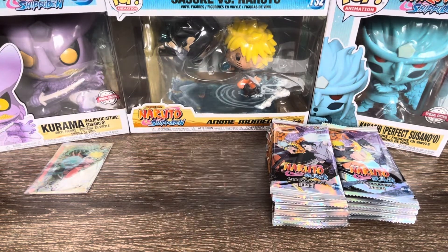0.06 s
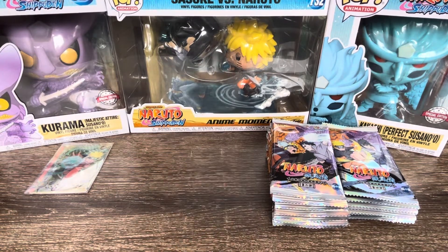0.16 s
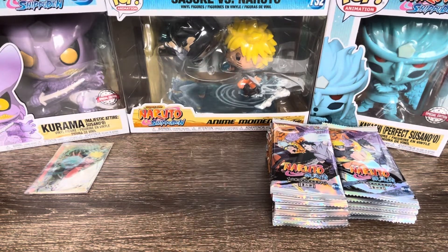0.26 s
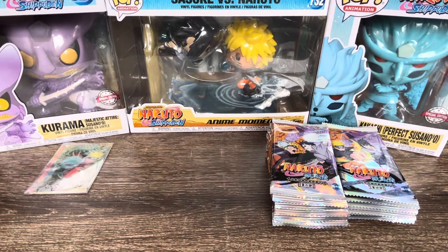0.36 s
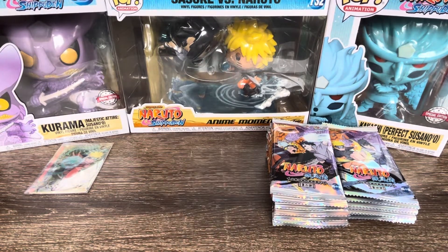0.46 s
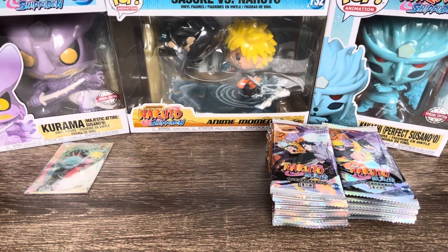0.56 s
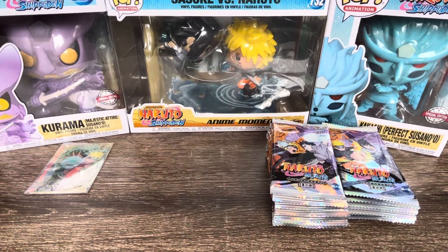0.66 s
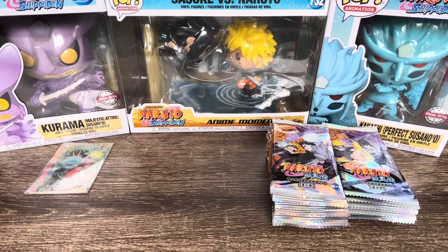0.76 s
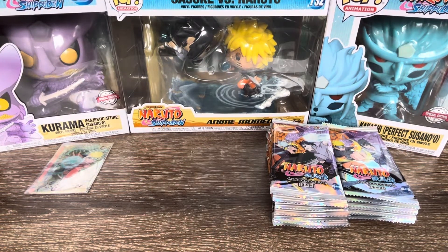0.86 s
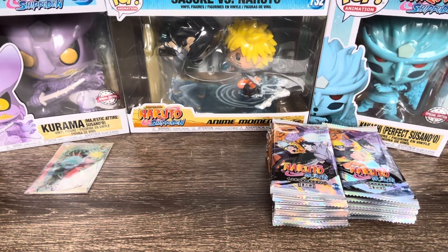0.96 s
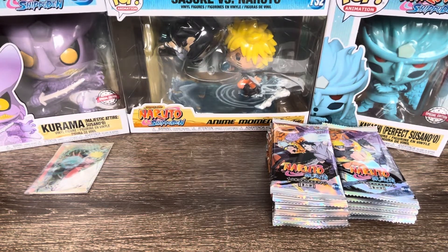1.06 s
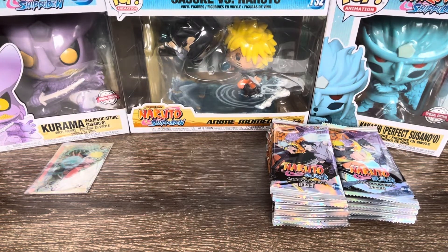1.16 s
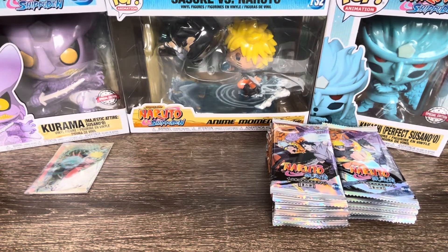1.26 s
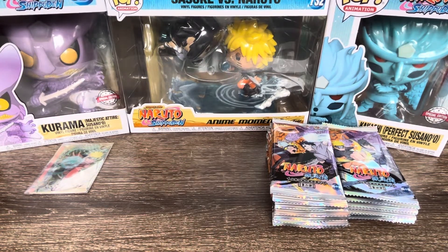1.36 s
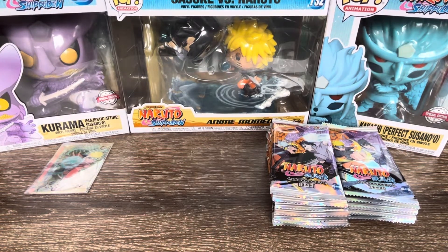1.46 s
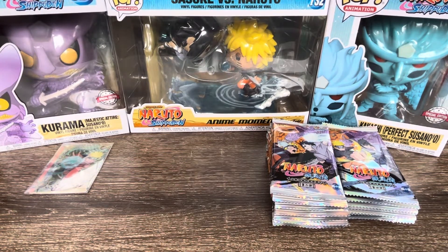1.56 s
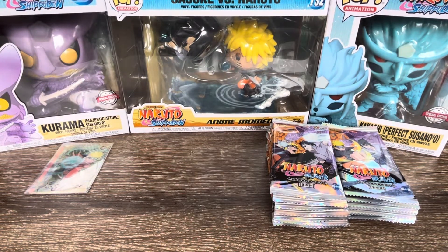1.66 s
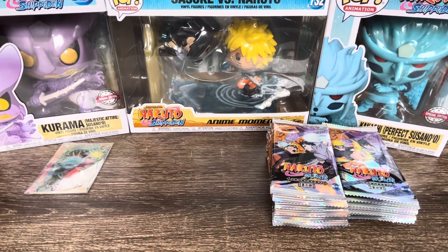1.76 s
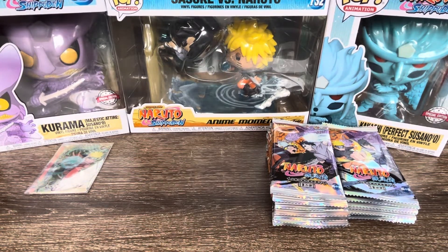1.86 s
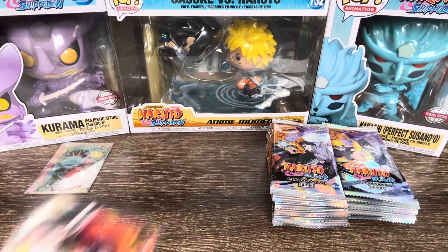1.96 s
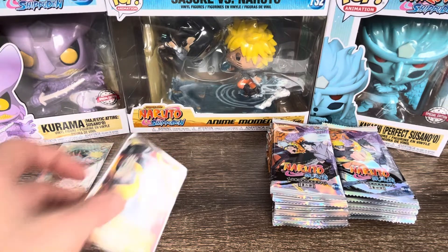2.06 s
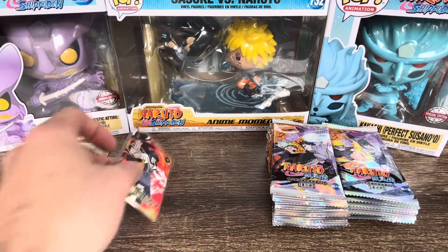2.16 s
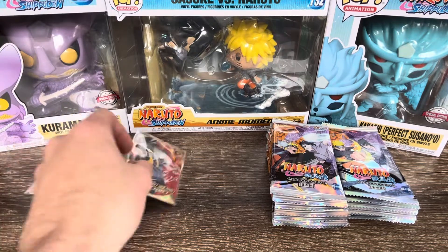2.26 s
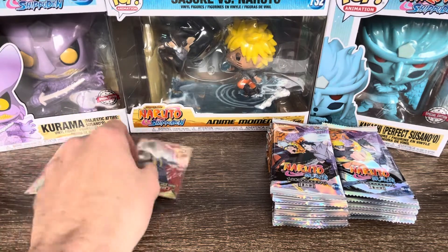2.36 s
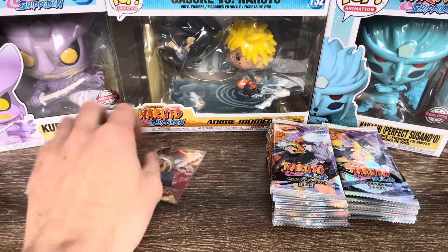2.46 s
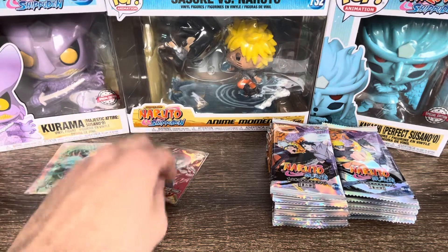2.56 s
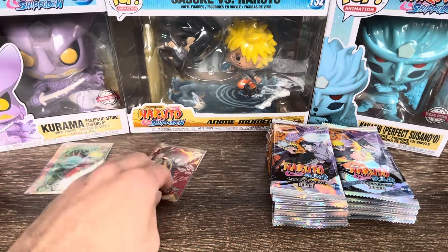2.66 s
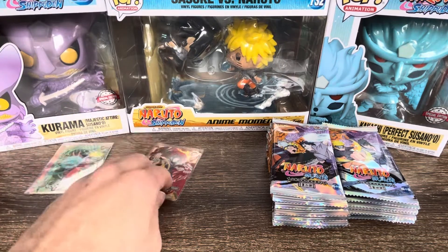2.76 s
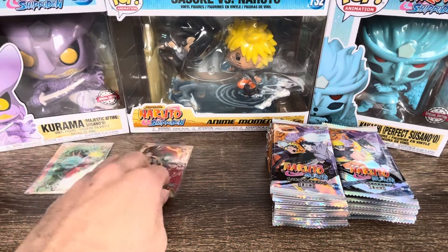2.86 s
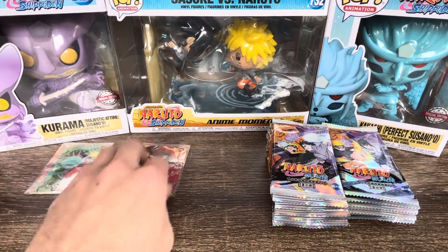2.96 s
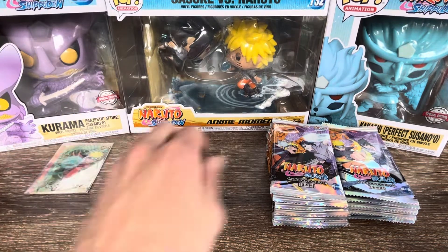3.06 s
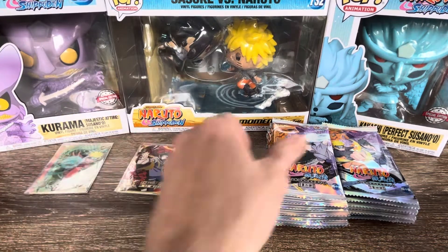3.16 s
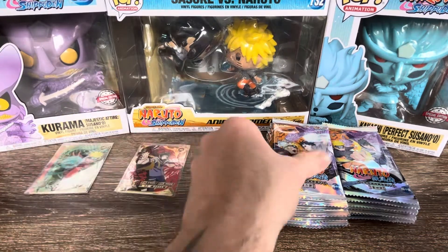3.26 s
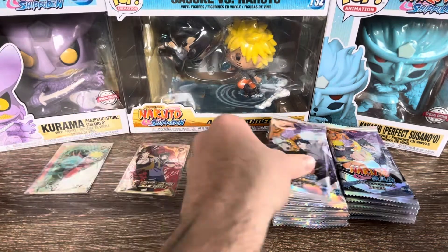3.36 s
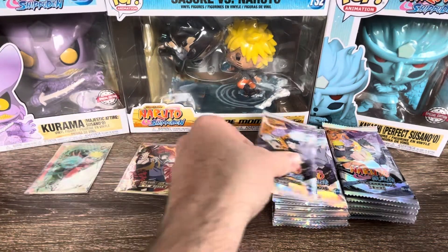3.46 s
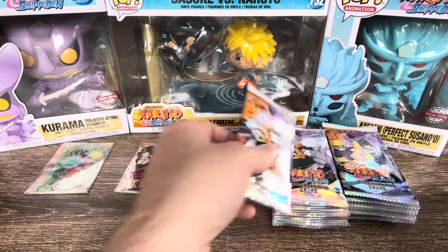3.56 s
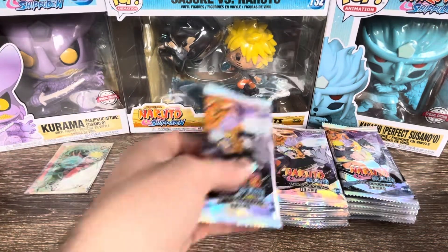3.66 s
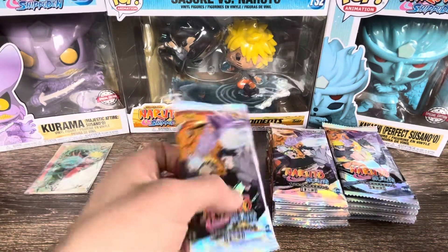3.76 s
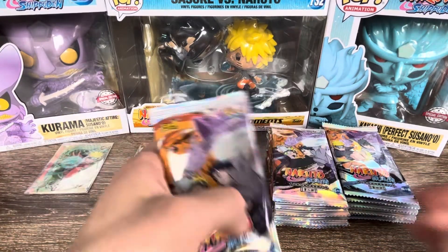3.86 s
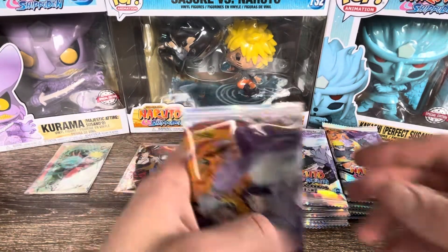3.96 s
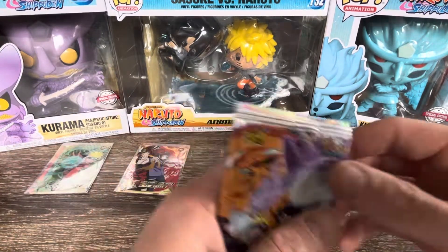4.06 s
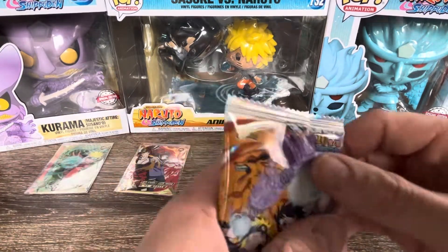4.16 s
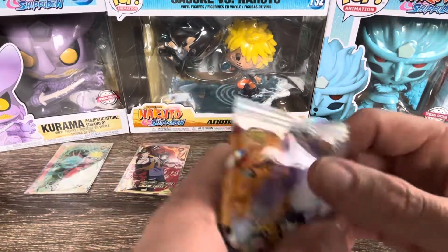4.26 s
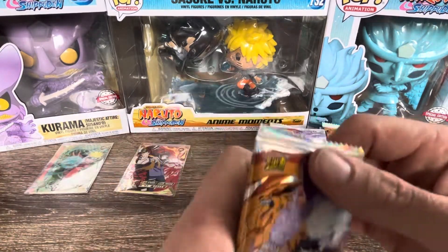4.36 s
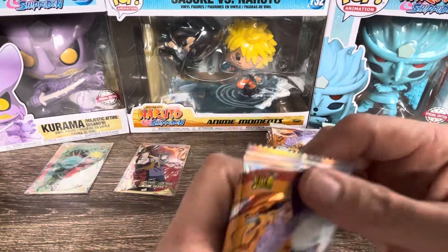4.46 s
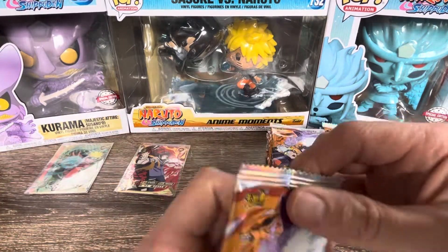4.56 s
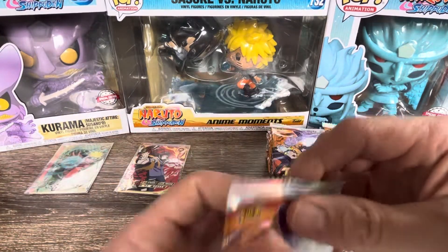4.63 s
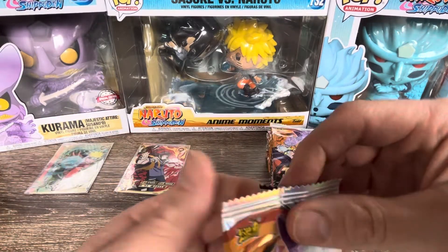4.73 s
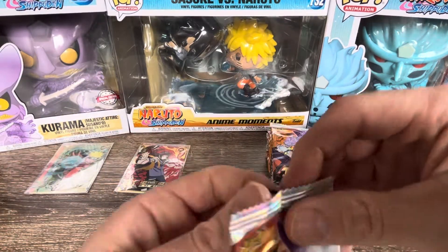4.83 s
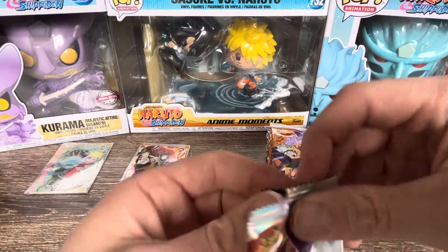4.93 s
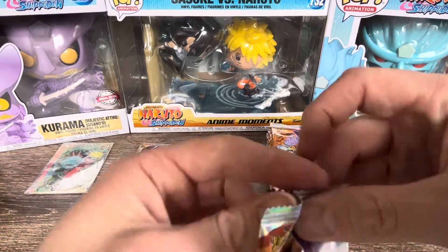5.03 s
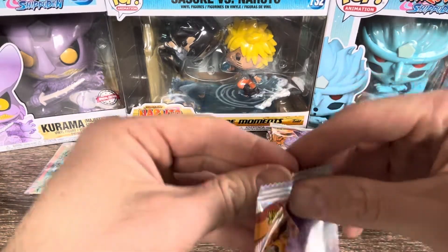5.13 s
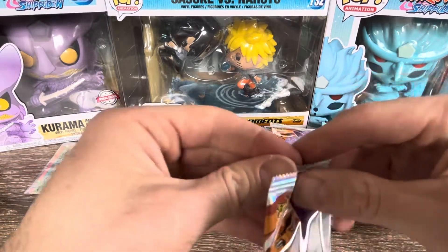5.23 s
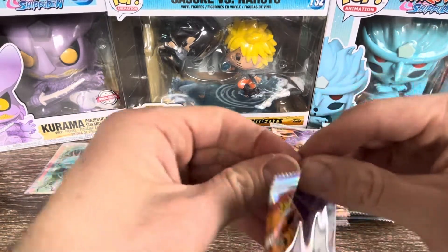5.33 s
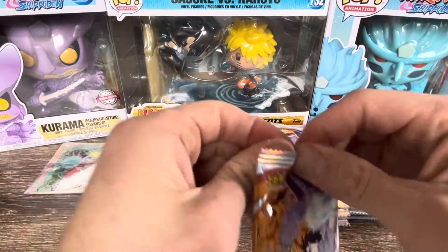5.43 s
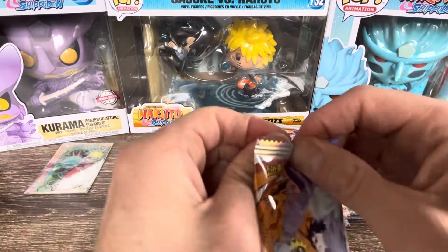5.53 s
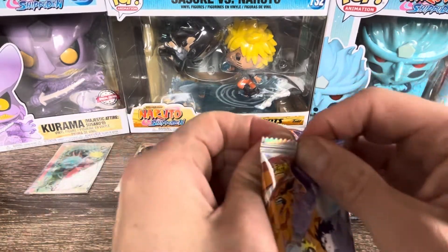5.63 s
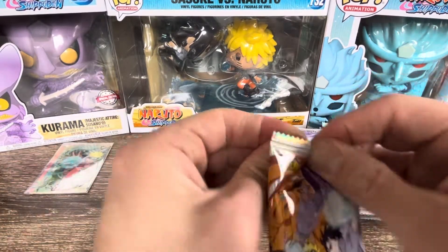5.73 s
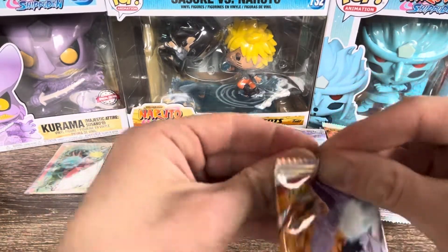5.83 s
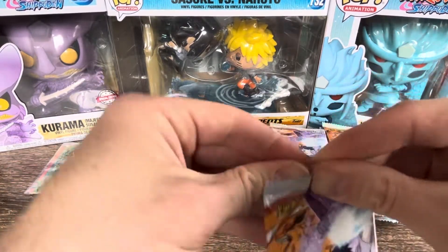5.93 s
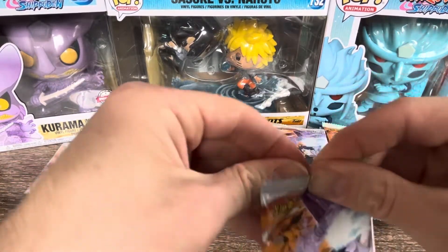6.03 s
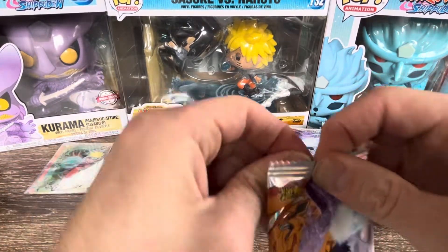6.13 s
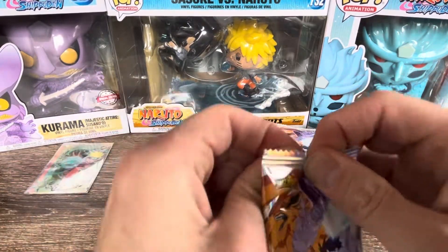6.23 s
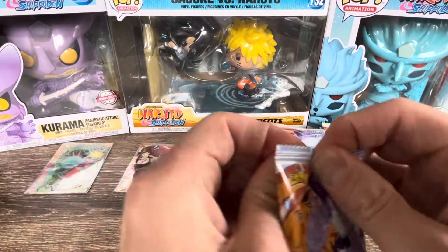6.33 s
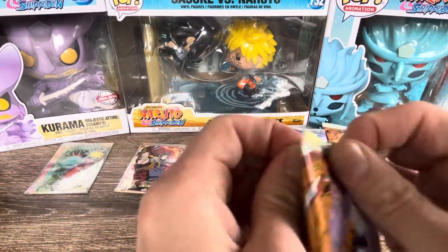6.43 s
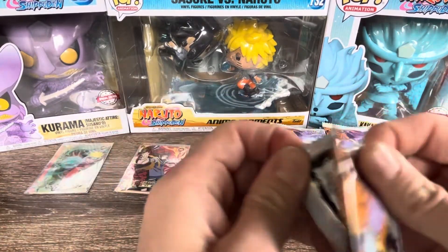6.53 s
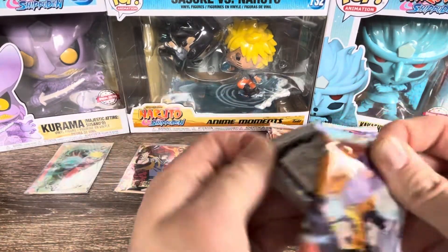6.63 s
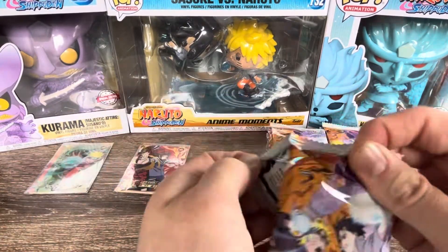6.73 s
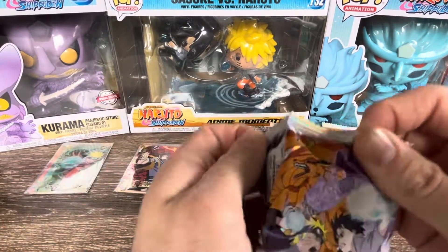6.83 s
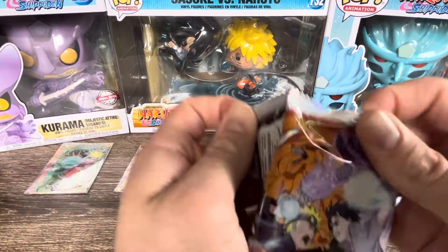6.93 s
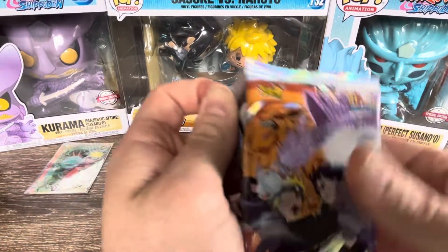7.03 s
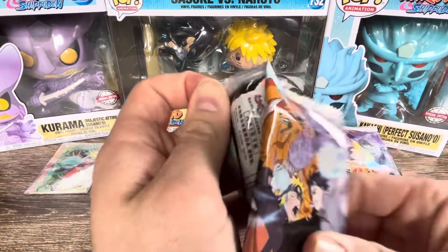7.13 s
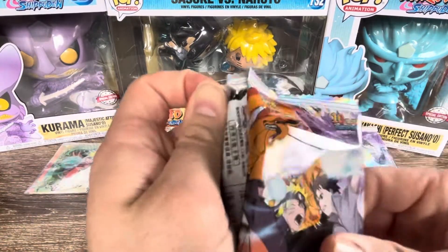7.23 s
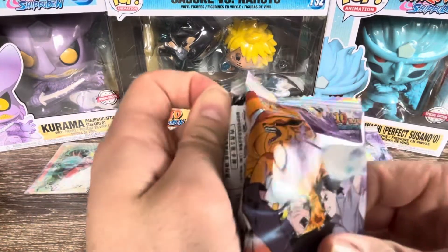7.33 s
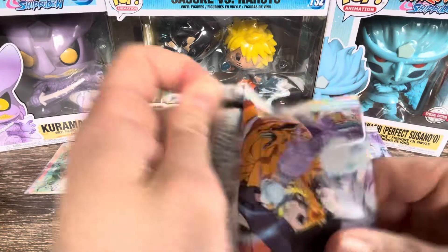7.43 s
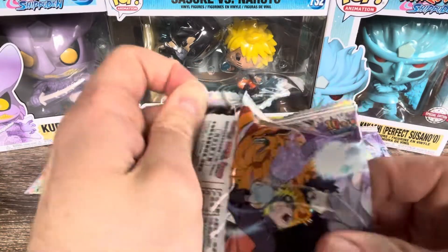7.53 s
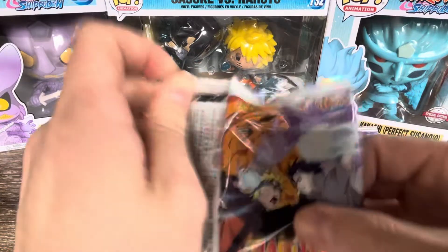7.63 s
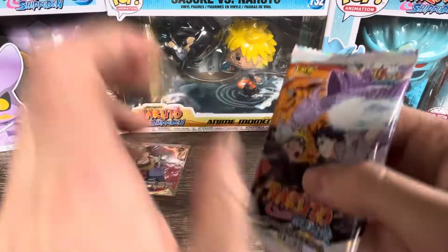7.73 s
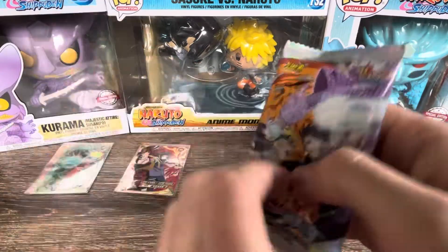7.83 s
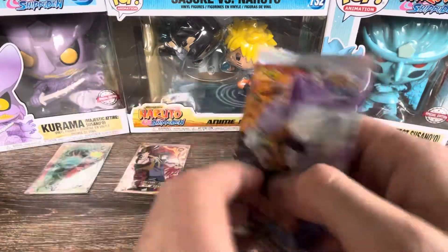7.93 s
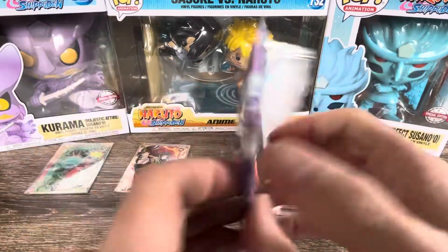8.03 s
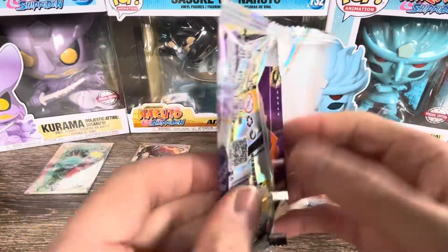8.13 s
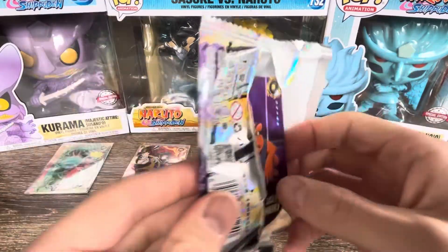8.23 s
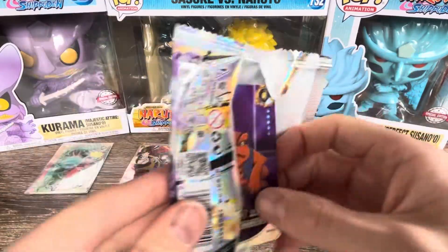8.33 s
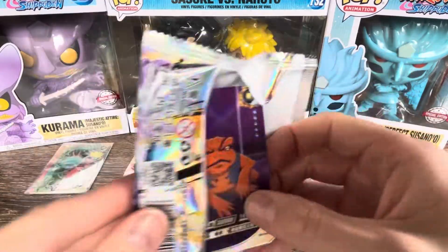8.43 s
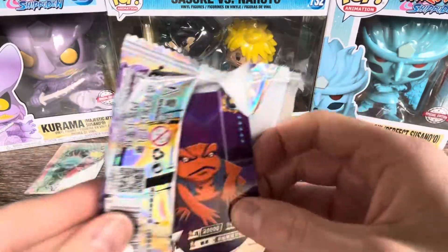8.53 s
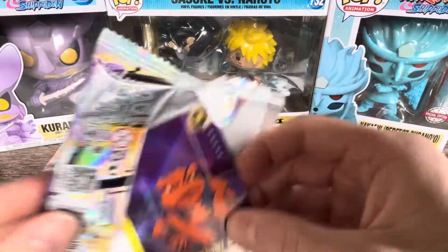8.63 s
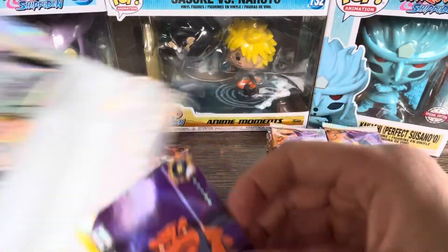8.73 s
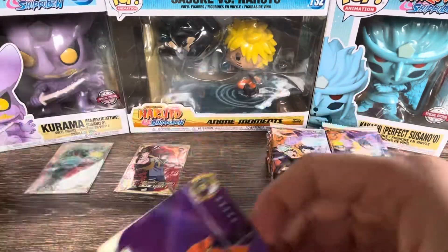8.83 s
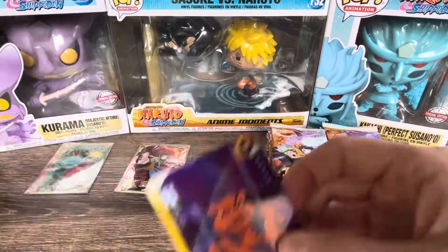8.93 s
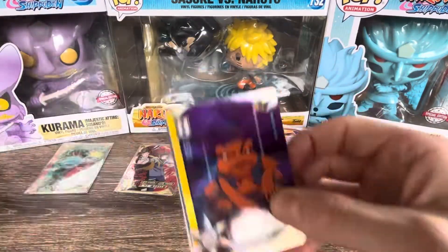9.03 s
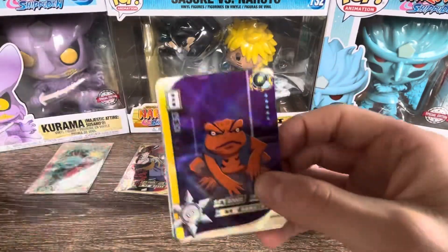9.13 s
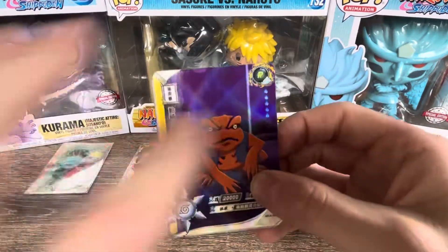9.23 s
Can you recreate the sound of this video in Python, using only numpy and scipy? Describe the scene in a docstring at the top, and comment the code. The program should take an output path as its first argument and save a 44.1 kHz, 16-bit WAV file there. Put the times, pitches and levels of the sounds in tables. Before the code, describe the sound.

A close, dry stereo take at a wooden table in a small furnished room, with very faint hiss. At 0 s cards brush softly, with a sharp snap at 0.1 s. Light clicks follow around 0.8 and 1.5 s, the latter clearer, then near quiet with faint rubs and tiny ticks until 3.4 s. Foil slides at 3.6 s, and from 4.05 to 4.5 s it crackles brightly and loudly. From 4.6 to 6.3 s come sparser crinkles and isolated pops, with a tiny high squeak at 4.6. From 6.4 s the crackling thickens; tearing peaks between 6.7 and 7.7 s, with short rough skin squeaks and dull low thumps, the strongest near 7.4. Looser, papery rustling and snaps run from 7.9 to 8.8 s as cards slip out, with soft air movement and a small rising squeak at 8.7. After that only a faint card touch at 9.24 s.

```python
"""First comes a soft brush of cards and a sharp snap: cards are shuffled and laid on a wooden table.
Then two hands pick up a foil pack, tear it and slip the cards out. Ringing noise bursts make the snaps,
roughened noise the rustle, gliding tones the squeaks, and sinking low tones the thumps. Low noise is air
moved by hands at a close pair of microphone ports; scattered echoes make a small furnished room, over hiss."""
import sys
import numpy as np
from scipy import signal
from scipy.fft import rfft, irfft
from scipy.io import wavfile
from scipy.ndimage import uniform_filter1d

SR = 44100
rng = np.random.default_rng(int(sys.argv[2]) if len(sys.argv) > 2 else 0)


def master_out(mix):
    """Clip the mix to full scale and print it as 16-bit PCM to the path in sys.argv[1]."""
    frames = np.transpose(np.atleast_2d(mix))
    ceiling = np.clip(frames, -1, 1)
    pcm = np.round(ceiling * 32767).astype(np.int16)
    wavfile.write(sys.argv[1], SR, pcm)


N = 409688

BASS_LEFT_DB = 2.5  # the left port takes more of the low sound
LEADS = 7, 8, 4  # samples by which the left port hears low, middle and high sound earlier
STIR_LEAD = 45  # samples by which low pushes and moving air reach the left port first
EDGE_HZ = 16700  # upper limit of the sound

# creases that buckle: t/s, level/dB of the crease, crease f/Hz, panel level/dB relative to the crease,
# panel f/Hz, finest-crease level/dB relative to the crease
BUCKLES = [(0.1211,-6.5,3020,-4.5,1805,-7.5),(0.808,-30,5830,-1.5,1344,-7.5),(1.049,-36.5,6320,-0.5,1510,-2),(1.4672,-27.5,5900,-8,2080,0.5),
           (1.508,-25.5,2990,-8,2520,-31),(1.532,-14.5,6070,-13.5,1524,-10.5),(1.5914,-30,7100,-0.5,1190,-4),
           (1.724,-34,5430,-14,900,-6),(2.1627,-40,6400,-12,820,2),(2.355,-33,4040,-17,2580,-7.5),(3.4515,-52,6200,14.5,800,-10),
           (3.873,-41.5,4300,4,875,-16),(3.9368,-29,4910,0,2160,-30),(4.0586,-21,5770,-6,1000,-26),(4.082,-11.5,4790,-6,2290,-24.5),
           (4.1444,-2.5,4850,-14.5,2510,-4.5),(4.167,-7,5750,-12.5,1850,-15.5),(4.179,-16,5050,-9,1710,4.5),(4.2078,-4,5930,-1.5,2534,-5.5),
           (4.2384,-8,5660,-6.5,2490,-9),(4.259,-21,3980,-4.5,810,-15),(4.3,-13.5,2950,-9.5,422,-27),(4.352,-6.5,7000,-12,625,-7),(4.384,-25,4530,-3,1020,-11),(4.483,-17,4760,-25,2190,-5),
           (4.5161,-17,3050,2.5,980,-2.5),(4.536,-10,5950,-9,1970,-24),(4.7701,-18,4300,-8,2083,-29),(4.926,-27,4000,-4,616,-2),(4.931,-27,4150,1,1543,1.5),
           (5.07,-24,5630,-0.5,1050,-9),(5.093,-26,5650,-10,2400,-27),(5.101,-28.5,4330,-7,1030,-20),(5.1442,-43.5,3900,16,1720,-20),(5.37,-24,3880,-26,2670,3),
           (5.484,-13.5,6060,-3.5,904,-8.5),(5.6836,-7,4840,-22.5,2146,-6),(5.738,-23.5,5550,-18,2240,7.5),(5.771,-46,2650,20.5,2216,-22),
           (5.8274,-25,5430,-37,2590,-4),(5.859,-48.5,3940,15.5,1980,-14),(5.89,-14,3470,-17,1010,-14),(5.911,-29,5130,0,960,-6),
           (6.0378,-43.5,2980,10.5,1500,-23),(6.072,-11.5,2200,-5.5,1923,-10),(6.085,-18,4590,-1,1880,-3),(6.2543,-15.5,5270,-11,2520,-19),
           (6.2796,-42,5410,10.5,603,-20),(6.333,-52,4030,10,920,-6),(6.38,-10.5,2380,0.5,1604,-2),(6.383,-16.5,4500,-2,1510,6),(6.477,-18,4950,-21,1500,-2),(6.4835,-8.5,4740,-6,2040,-0.5),(6.5016,-7.5,3160,-5,880,-8),
           (6.571,-10,6550,-4.5,1090,4),(6.6265,-11.5,6380,-11,1260,-17),(6.6712,-15.5,5600,2,1220,-34),(6.7174,-5.5,6360,-24.5,1020,-2),
           (6.749,-22.5,5900,3.5,1150,8),(6.7621,-3,6730,-36.5,2030,-8),(6.7703,-7.5,6560,1,2014,-13),(6.79,-11,4410,-8,446,-19),
           (6.839,-15.5,6340,-8.5,1080,5.5),(6.9045,-41,4000,8,800,-18),(6.907,-12.5,6640,-2.5,2510,-5.5),(6.922,-32,4120,11.5,704,-9),(6.931,-28,6570,2,1100,10),(6.951,-16,4840,-6,516,-16),
           (6.957,-4,4630,-11,2150,-2.5),(7.0564,-11,3880,-0.5,1960,-3),(7.107,-26,6460,-16,2200,2),(7.1147,-26,6400,-17,2236,9.5),(7.125,-7,5590,-8.5,1660,-2.5),
           (7.1472,-26.5,7100,-6,1010,-3),(7.1688,-20.5,4100,2,1970,1),(7.1817,-0.5,4475,-11.5,571,-9.5),(7.2222,-13.5,5730,-5.5,1105,-20),
           (7.288,-9,6440,-4,943,-21),(7.2968,-5,6420,-28.5,1937,-28.5),(7.3083,-6,4850,-12.5,1990,-2.5),(7.3497,-15,4520,-11.5,823,-13.5),
           (7.3806,-1.5,2600,-0.5,1610,-7),(7.4232,-3,2890,-3.5,1880,-4),(7.4342,-6.5,3510,-1,960,-31.5),(7.4997,-32,4640,10,624,-23.5),
           (7.5334,-28,3300,4.5,760,7),(7.5456,-17.5,3300,0.5,528,-4),(7.5827,-24,5130,7,602,-4.5),(7.602,-2,5620,-15,1100,-12),
           (7.6165,-15,4840,1.5,557,5),(7.6423,-6,3580,-6.5,1790,-8),(7.651,-16,4030,-0.5,600,-2),(7.681,-22.5,3940,4.5,1920,-1),(7.71,-20.5,2520,-2.5,577,-27),
           (7.7934,-29,4040,6.5,515,3),(7.809,-38.5,3000,6.5,800,-10),(7.9119,-18.5,4180,-15,417.4,-5),(7.9612,-10,5100,-6.5,1820,-9),(7.975,-9.5,4360,-17,987,-0.5),
           (8.0135,-14,4140,-1,607,-7),(8.0607,-25.5,2500,9.5,1107,-2),(8.125,-18,3570,1,476,-1),(8.13,-17,4880,2,796,-18),
           (8.16,-9.5,6720,-13.5,814,-4),(8.326,-29,4940,5.5,596,-7.5),(8.368,-21.5,2500,2.5,1040,-30),(8.4225,-2.5,3960,-14.5,1564,-36),
           (8.5278,-12.5,5110,-6.5,683,-20),(8.55,-22,4960,4,593,-19),(8.5632,-10.5,2840,-5,2330,-29),(8.584,-14,4080,2.5,1190,-29),
           (8.6407,-6,4946,-2,570,-9),(8.656,-18.5,4950,-6,1060,-18),(8.676,-18.5,3000,-6,420,-14),(8.7447,-32,5630,5.5,1110,4.5),(8.7622,-41.5,4350,15,450,-6),(8.8008,-40,3160,17,700,-11)]
# where the hands work: t/s, left-right level/dB
HAND_PLACES = [(0.0, -2), (0.13, -4), (0.36, 5), (1.03, 0), (1.78, 1.5), (4.17, -2), (6.42, 0), (6.75, -2),
               (9.29, 4)]
# colour of foil noise, here and in the rustle: f/Hz, level/dB
FOIL_COLOUR = [(120, -29.5), (200, 1.5), (860, -2), (1070, 3), (1360, -3), (1640, 1), (2900, 2), (4500, 5),
               (6680, 3), (8030, -1), (10800, -1), (13800, -7), (16500, -23.5)]
PEAK_S = 0.005  # time from the start of a burst to its peak
FINE_HZ = 9600  # colour of the finest creases


def snaps():
    """Each snap swells to a peak and dies; crease and panel ring over a soft low note falling in pitch."""
    s, db, crease_hz, panel_db, panel_hz, fine_db = np.transpose(BUCKLES)[:, :, None]
    pan_db = np.interp(s, *np.transpose(HAND_PLACES))
    t = np.arange(1500) / SR
    after = np.maximum(t - PEAK_S, 0)
    noise = np.moveaxis(rng.standard_normal((len(s), 3, len(t))), 1, 0)
    # the third noise, smoothed, makes each burst waver in strength over time, alike at both ports
    noise = noise[:2] * gain_of(8.0 * uniform_filter1d(noise[2], size=9, axis=-1))

    fall_hz = 95 + 0.6 * panel_hz * np.exp(-after / 0.004)
    low_fall = np.sin(2 * np.pi * np.cumsum(fall_hz, -1) / SR)
    low_fall = low_fall * (1 - np.exp(-after / 0.0054)) * np.cos(np.pi / 2 * t / t[-1])
    low_fall = low_fall * gain_of(db + panel_db - 13 - 60 * t / 0.044)
    sound = ports(low_fall, low_fall, pan_db + BASS_LEFT_DB, 1, LEADS[0])

    # band limits in Hz, time in s to rise and to die by 60 dB, level and left-right dB,
    # ring Hz, cycles until it dies by 60 dB, ring share, share common to both ports
    parts = [
        (463, 3570, 0.009, 0.019, panel_db, BASS_LEFT_DB, panel_hz, 23.0, 0.15, 0.6),  # panel
        (1690, 11940, 0.0072, 0.011, 0, 0.0013, crease_hz, 24, 0.22, 0.1),  # crease
        (9500, 15560, 0.007, 0.0062, fine_db, 0, FINE_HZ, 9, 0.088, 1.0)]  # finest creases
    for lead, part in zip(LEADS, parts):
        lo_hz, hi_hz, rise, t60, part_db, left_db, hz, cycles, rung, share = part
        swell = gain_of(-60 * np.maximum(PEAK_S - t, 0) / rise)
        burst = noise * swell * gain_of(-60 * after / t60)
        burst = colour(burst.reshape(-1, len(t)), FOIL_COLOUR)
        burst = band(burst, lo_hz, hi_hz).reshape(noise.shape)
        burst = focus(burst, hz, 1.9)
        ring = np.sin(2 * np.pi * hz * t) * gain_of(-60 * after * hz / cycles) * swell
        burst = burst / abs(burst).max(-1, keepdims=True)
        burst = burst + rung * ring / abs(ring).max(-1, keepdims=True)
        sound = sound + gain_of(db + part_db) * ports(burst[0], burst[1], pan_db + left_db, share, lead)
    return place(s[:, 0] - PEAK_S + 0.0012, sound)


def focus(x, hz, sharpness):
    """Each crease has its own colour: a broad resonance lifted out of the burst."""
    f = np.fft.rfftfreq(x.shape[-1], 1 / SR) + 1
    resonance = 1 / (1 + 1j * sharpness * (f / hz - hz / f))
    return irfft(rfft(x) * (1.0 + resonance), x.shape[-1])


# a light stroke only slides; towards the second level the creases take over
CALM_DB, CRUMPLE_DB = -77, -37


def rustle():
    """A smooth slide of skin on foil, roughened by crinkles and finer ticks that come in clumps."""
    levels = strokes()
    middle_db = 20 * np.log10(levels[1])
    force = np.clip((middle_db - CALM_DB) / (CRUMPLE_DB - CALM_DB), 0, 1)
    clumps = gain_of(3.9 * evened(uniform_filter1d(rng.standard_normal(N), 500)))
    crinkles = creases(350, 3.5, 0.009, clumps)
    ticks = creases(1500, 4.2, 0.002, clumps)
    grain = 0.6 * crinkles + 0.8 * ticks
    shape = 1.6 - 0.85 * force + (0.27 + 0.5 * force) * grain
    noise = shimmer(colour(shape * rng.standard_normal((2, N)), FOIL_COLOUR), force)
    # panel, middle and fine creases: band limits in Hz, left-right dB, share common to both ports
    parts = [(208.0, 1890, BASS_LEFT_DB, 0.13), (2540, 7400, 0, 0.12), (8250, 22000, 0.0036, 1.0)]
    sound = 0
    for lead, level, (lo_hz, hi_hz, left_db, share) in zip(LEADS, levels, parts):
        part = evened(band(noise, lo_hz, hi_hz, order=3))
        sound = sound + level * ports(part[0], part[1], left_db, share, lead)
    return sound


# strokes of fingers on card and foil: t/s, hold t/s, level/dB of the middle creases,
# panel level/dB and fine-crease level/dB, both relative to the middle
FINGER_STROKES = [(0, 0.056, -43.5, -12, -11), (0.114, 0.056, -41.5, -3.5, -12),
                  (0.306, 0.038, -56, -8, -9.5), (0.517, 0.022, -73, 2, -14),
                  (0.401, 0.054, -70.5, -24, -5), (0.794, 0.0052, -46.5, -8.5, -9),
                  (1.001, 0.0068, -67, -17, -1), (1.048, 0.011, -62.5, -2.5, 3.5),
                  (1.438, 0.09, -58.5, -6, -2), (1.53, 0.068, -51, -8, -9), (1.708, 0.023, -52.5, -5, -12),
                  (1.924, 0.16, -74.5, 8.5, -25), (2.162, 0.11, -61, -8, 2), (2.317, 0.022, -56.5, -4, -13),
                  (2.584, 0.023, -78, -26, 3), (2.758, 0.026, -84, -20, 12), (3.271, 0.08, -61.5, -8, 4),
                  (3.355, 0.14, -59, -28, 1), (3.429, 0.11, -52.5, -9.5, -4), (3.575, 0.045, -45, -13, -7),
                  (3.612, 0.095, -40.5, -14, -2.5), (3.729, 0.02, -30, -42, -8.5),
                  (3.814, 0.022, -48.5, -11.5, -12), (3.854, 0.0063, -51.5, -20, 5),
                  (3.949, 0.089, -48, -6, -4), (4.074, 0.014, -37, -11.5, -13),
                  (4.158, 0.0072, -23, -16.5, -10), (4.188, 0.12, -30, -12.5, -11.5),
                  (4.354, 0.18, -29, -18.5, -12.5), (4.441, 0.13, -34, -13.5, -12.5),
                  (4.594, 0.016, -36, -10.5, -3.5), (4.804, 0.15, -40.5, -18, -5),
                  (5.047, 0.077, -44, -11.5, -11), (5.237, 0.0081, -47.5, -6, -1.5),
                  (5.37, 0.14, -56.5, -24, -2.5), (5.489, 0.037, -50, -7.5, -17),
                  (5.688, 0.057, -39, -30, -10), (5.811, 0.077, -50.5, -35, -4),
                  (5.896, 0.023, -38.5, -18.5, -17), (6.014, 0.091, -55, -27, -7),
                  (6.135, 0.13, -48, -20, -5), (6.385, 0.0032, -28, -7, -12.5),
                  (6.488, 0.11, -25, -6.5, -10), (6.58, 0.075, -28.5, -43, -17),
                  (6.722, 0.054, -31.5, -10, -14), (6.775, 0.023, -26.5, -9, -16),
                  (6.869, 0.078, -38.5, -9.5, -9), (6.93, 0.054, -28.5, -5.5, -12.5),
                  (7.048, 0.2, -32.5, -3.5, -10.5), (7.294, 0.0063, -24.5, -7, -17),
                  (7.389, 0.035, -22.5, -1, -13), (7.541, 0.051, -40.5, -0.5, -9.5),
                  (7.6, 0.1, -29, -9.5, -10.5), (7.784, 0.22, -54, -4, -6),
                  (7.97, 0.38, -34.5, -9.5, -11.5), (8.102, 0.74, -36, -8, -10),
                  (8.206, 0.15, -43.5, -6, -11), (8.402, 0.15, -49.5, -4, -4), (8.537, 0.11, -38.5, -4, -8),
                  (8.621, 0.18, -36.5, -7, -5), (8.792, 0.12, -58, -1, -20), (9.243, 0.013, -46.5, -6, -18)]
# a stroke swells, sinks slowly while it is held, then dies
RISE_DB_PER_S, SAG_DB_PER_S, RELEASE_DB_PER_S = 1207, 49, 259.5
REST_DB = (-78, -82.5, -86.5)  # faint rub left between strokes: low, middle, high


def strokes():
    """Attack, hold and release of every stroke; gives the level of panel, middle and fine creases."""
    t = np.arange(0, N + 64, 64) / SR
    s, hold, db, panel_db, fine_db = np.transpose(FINGER_STROKES)[:, :, None]
    hold = abs(hold)
    loss_db = RISE_DB_PER_S * np.maximum(s - t, 0)
    loss_db = loss_db + SAG_DB_PER_S * np.clip(t - s, 0, hold)
    loss_db = loss_db + RELEASE_DB_PER_S * np.maximum(t - s - hold, 0)
    levels = []
    for part_db, rest_db in zip((panel_db, 0, fine_db), REST_DB):
        level = np.linalg.norm(gain_of(db + part_db - loss_db), axis=0) + gain_of(rest_db)
        levels.append(np.interp(np.arange(N) / SR, t, level))
    return levels


def creases(per_s, spread_db, t60, clumps):
    """Tiny creases of unequal size each leave a short dying trace; together they form an envelope."""
    struck = rng.random(N) < per_s * clumps / SR
    size = gain_of(spread_db * np.minimum(rng.exponential(1, N), 3)) * struck
    decay = gain_of(-60 * np.arange(600) / SR / t60)
    return evened(signal.oaconvolve(size, decay)[:N])


# tones of the taut pack under a sliding finger: f/Hz, half width f/Hz, level/dB at full tautness
TAUT_TONES = [(4440, 1300, 7), (6670, 650, 6.5)]


def shimmer(x, force):
    """The taut sheet favours two tones, less so when crumpled; small patches of tone come and go."""
    hz, t, z = signal.stft(x, SR, nperseg=256)
    patches = uniform_filter1d(rng.standard_normal(z.shape[1:]), 2, 0)
    patches = evened(uniform_filter1d(patches, 16, 1))
    tones_db = sum(db * np.exp(-((hz - f) / width) ** 2) for f, width, db in TAUT_TONES)[:, None]
    taut = 1 - 0.52 * np.interp(t, np.arange(N) / SR, force)
    return signal.istft(z * gain_of(4.3 * patches + taut * tones_db), SR, nperseg=256)[1][:, :N]


# skin sticking and slipping on the foil: t/s, length t/s, first f/Hz, last f/Hz, level/dB,
# overtone level/dB, roughness 0-1
SKIN_SLIPS = [(4.595, 0.012, 5680, 7260, -21, -7.5, 0.08), (6.647, 0.017, 1144, 1040, -27, 5, 0.52),
              (6.985, 0.017, 742, 555, -32, -15, 0.8), (7.034, 0.017, 2170, 2000, -30, -12, 0.5),
              (8.709, 0.025, 5800, 7590, -27.5, -14, 0.39)]


def squeaks():
    """Slips whose rate glides and wavers; rough ones stumble in strength and carry a puff of noise each."""
    out = np.zeros(N)
    for s, length, first_hz, last_hz, db, over_db, rough in SKIN_SLIPS:
        count, rough = round(length * SR), np.clip(rough, 0, 1)
        drift, stumble, puffs = rng.standard_normal((3, count))
        along = np.linspace(0, 1, count)
        waver = 1 + 0.065 * rough * evened(uniform_filter1d(drift, 90))
        slip_hz = (first_hz + (last_hz - first_hz) * along ** 0.73) * waver
        turn = 2 * np.pi * np.cumsum(slip_hz) / SR
        # overtones 2, 4 and 6, as far as they fit below the upper limit
        overtones = sum(np.sin(k * turn) * (k * last_hz < EDGE_HZ) for k in range(2, 7, 2))
        puffs = (1 + np.cos(turn)) * evened(band(puffs, 6100, 7500))
        overtones = (1 - rough) * overtones + 0.5 * rough * puffs
        strength = gain_of(2.0 * rough * evened(uniform_filter1d(stumble, 70)))
        slips = (np.sin(turn) + gain_of(over_db) * overtones) * strength
        fade = signal.windows.tukey(count, .3) * gain_of(-5.0 * along)
        out[round(s * SR):][:count] = gain_of(db) * slips * fade
    return ports(out, out, 0, 0.45, LEADS[1])


# the pack flexing and knocks through the table: t/s, level/dB of the push, f/Hz it settles to
PUSHES = [(1.717, -55.5, 140), (2.173, -57.5, 74), (2.302, -41.5, 210), (2.8, -63.5, 80.6),
          (3.028, -57.5, 63), (3.085, -59.5, 62), (4.003, -48, 117), (4.157, -41.5, 175), (4.203, -45, 177),
          (4.303, -46.5, 93), (4.519, -52, 117), (4.772, -56, 76), (6.384, -41.5, 82), (6.938, -45, 112),
          (7.027, -44, 83.5), (7.066, -34.5, 135), (7.296, -37.5, 88), (7.386, -23.5, 81),
          (7.436, -32.5, 171), (7.605, -31.5, 70.6), (7.639, -29, 169), (7.806, -32.5, 88),
          (7.976, -37, 124.3), (8.13, -43.5, 74), (8.374, -47, 99), (8.643, -35, 74.5),
          (8.677, -33.5, 99.5), (9.239, -53.5, 129)]


def thumps():
    """A low push that swells, falls in pitch and rings on for some cycles, with a short rough rumble."""
    s, db, hz = np.transpose(PUSHES)[:, :, None]
    t = np.arange(9000) / SR
    push = np.sin(2 * np.pi * hz * t * (1 + 0.71 * np.exp(-t / 0.01)))
    push = push * (1 - np.exp(-t / 0.009)) ** 2 * gain_of(-60 * t * hz / 8.3)  # dies in 8.3 cycles
    rumble = evened(band(rng.standard_normal((len(s), 2, len(t))), 62, 356))
    rumble = rumble * (1 - np.exp(-t / 0.002)) * gain_of(-60 * t / 0.14)
    push = push / abs(push).max(-1, keepdims=True)
    push = gain_of(db) * (push + 1.1 * np.moveaxis(rumble, 1, 0))
    own = np.roll(push[1], 160, -1)
    return place(s[:, 0], ports(push[0], own, BASS_LEFT_DB, 0.99, STIR_LEAD))


# hands moving air near the ports: t/s, level/dB
MOVING_AIR = [(0.0, -61.5), (0.46, -77.5), (2.5, -73.5), (3.08, -69.5), (3.4, -75), (3.88, -69.5),
              (4.17, -58), (5.25, -82.5), (6.37, -81), (7.22, -50.5), (8.25, -62), (8.57, -46.5),
              (9.29, -83.5)]


def stir():
    """Moving air gives lumpy low noise, mostly shared by the ports; it reaches the left one first."""
    a, b = band(rng.standard_normal((2, N)), 35, 130, order=3)
    return gain_of(curve(MOVING_AIR)[0]) * evened(ports(a, b, BASS_LEFT_DB, 0.93, STIR_LEAD))


# how long the echo takes to die by 60 dB: f/Hz, t/s
ECHO_TIMES = [(250, 0.093), (700, 0.11), (1800, 0.17), (4600, 0.2), (8000, 0.021), (13000, 0.044)]
# colour of the echo: f/Hz, level/dB
ECHO_COLOUR = [(200, 1), (1000, 4.5), (4500, -1), (8000, 3.5), (14000, 11)]


def room(x):
    """Sparse echoes of random sign after a short gap, each band dying at its own speed."""
    taps = np.zeros((2, SR // 2))
    at = np.arange(420, SR // 2 - 20, 20)
    at = at + rng.integers(0, 20, (2, len(at)))
    np.put_along_axis(taps, at, rng.choice([-1., 1.], at.shape), 1)
    hz, t, z = signal.stft(taps, SR, nperseg=128)
    tail_db = read(ECHO_COLOUR, hz)[:, None] - 60 * t / read(ECHO_TIMES, hz)[:, None]
    tail = signal.istft(z * gain_of(tail_db), SR, nperseg=128)[1]
    return signal.fftconvolve(x.mean(0)[None], tail / np.linalg.norm(tail[0]), axes=1)[:, :N]


# colour of the background hiss: f/Hz, level/dB
HISS_COLOUR = [(18, -53), (30, -11), (70, 2), (252, -2.5), (760, -12), (988, -18), (2480, -26.5),
               (6900, -37.5), (12000, -29), (16000, -62.5)]
HISS_DB = -78


def hush():
    """Steady hiss of the quiet room and the microphones, made from coloured noise."""
    return gain_of(HISS_DB) * evened(band(colour(rng.standard_normal((2, N)), HISS_COLOUR), 64, 16000))


def gain_of(db):
    """Turns decibels into a factor."""
    return 10 ** (np.asarray(db) / 20)


def evened(x):
    """Brings the overall strength (root mean square) to 1."""
    return x / np.sqrt(np.mean(x ** 2) + 1e-20)


def read(points, hz):
    """Value of a spectrum table on a log-frequency axis."""
    f, value = np.transpose(points)
    return np.interp(np.log(hz + 1), np.log(f + 1), value)


def curve(rows):
    """Columns of a control table at every sample."""
    s, *columns = np.transpose(rows)
    return [np.interp(np.arange(N) / SR, s, c) for c in columns]


def colour(x, points):
    """Filter with the given spectrum that never sounds ahead of its input (minimum phase)."""
    log_gain = np.log(gain_of(read(points, abs(np.fft.fftfreq(4096, 1 / SR)))))
    taps = np.fft.ifft(np.exp(np.conj(signal.hilbert(log_gain)))).real[:1024]
    return signal.oaconvolve(x, taps[None], axes=-1)[..., :x.shape[-1]]


def band(x, lo_hz, hi_hz, order=2):
    """Keeps the sound between two frequencies."""
    return signal.sosfilt(signal.butter(order, [lo_hz, hi_hz], "bandpass", fs=SR, output="sos"), x)


def ports(near, own, pan_db, share, lead):
    """One sound at two ports: left first, right later and partly by its own path."""
    share = np.clip(share, 0, 1)
    right = np.sqrt(1 - share ** 2) * own + share * np.roll(near, lead, -1)
    return np.array([near * gain_of(pan_db / 2), right * gain_of(-pan_db / 2)])


def place(times, sounds):
    """Lays sounds (channels, events, samples) on the time line."""
    out = np.zeros((2, N + sounds.shape[-1]))
    for k, s in enumerate(times):
        out[:, round(s * SR):][:, :sounds.shape[-1]] += sounds[:, k]
    return out[:, :N]


def scene():
    """Foil and cards with their echo, low pushes, moving air and the background hiss."""
    cracks = snaps() + squeaks()
    slide = rustle()
    echo = room(gain_of(-14.5) * cracks + gain_of(-15.0) * slide)
    return cracks + slide + echo + thumps() + stir() + hush()


def record(dry):
    """The loudest peaks are rounded off; then the treble is cut at the upper limit."""
    held = .97 * np.tanh(dry / .97)
    return signal.oaconvolve(held, signal.firwin(511, EDGE_HZ, window=("kaiser", 9), fs=SR)[None], "same")


dry = scene()
out = record(dry)
master_out(out)
```